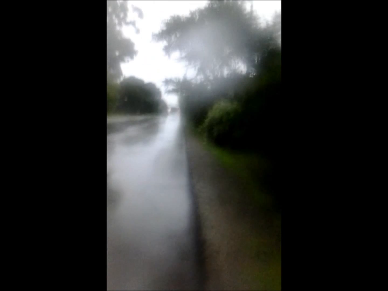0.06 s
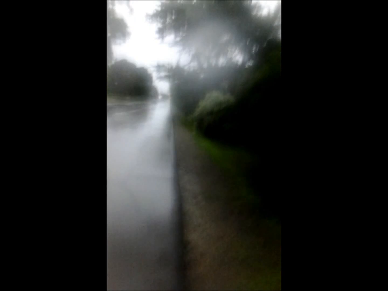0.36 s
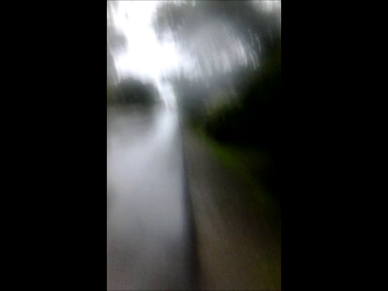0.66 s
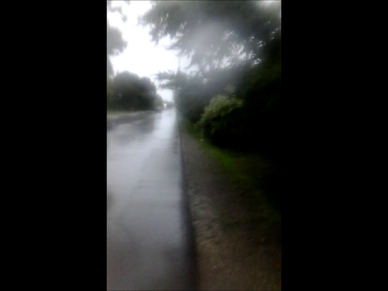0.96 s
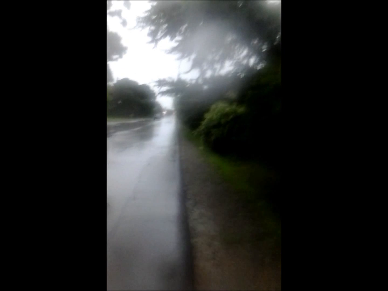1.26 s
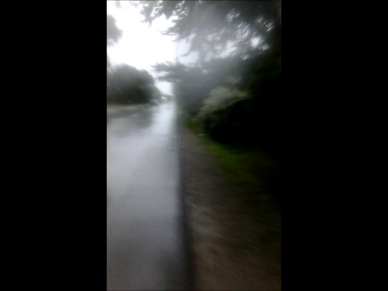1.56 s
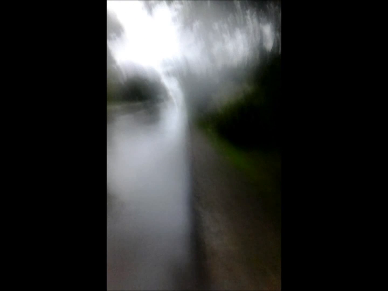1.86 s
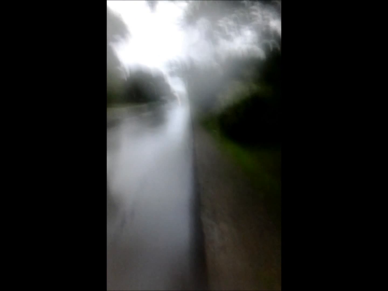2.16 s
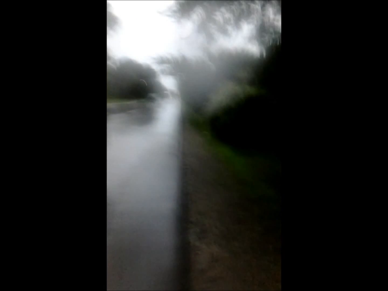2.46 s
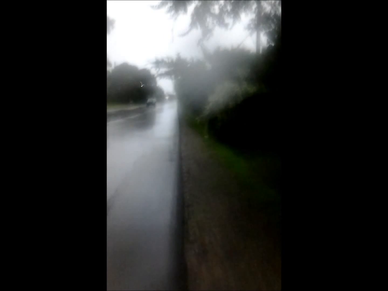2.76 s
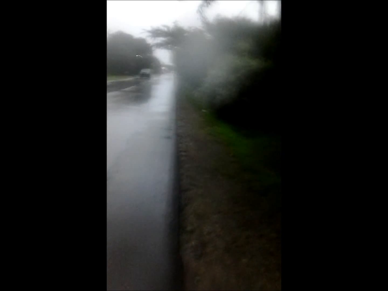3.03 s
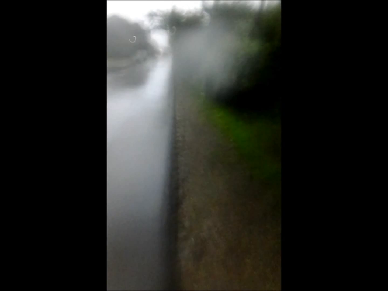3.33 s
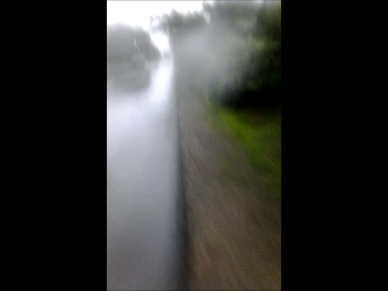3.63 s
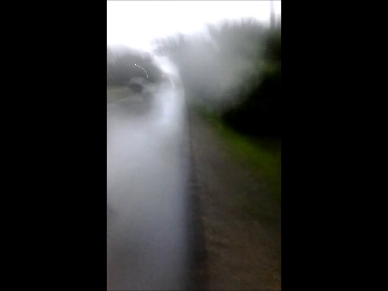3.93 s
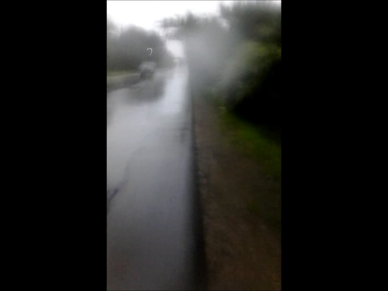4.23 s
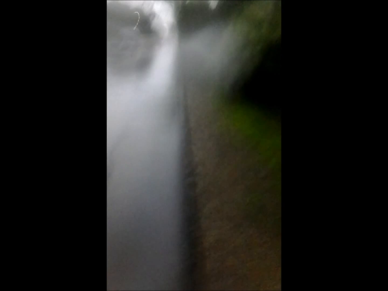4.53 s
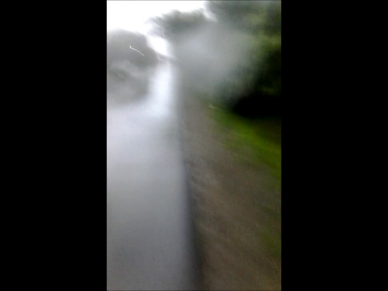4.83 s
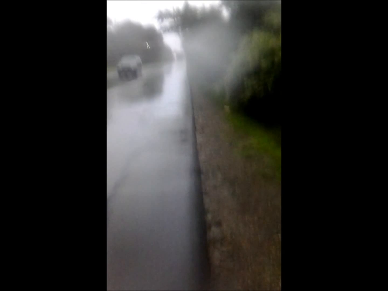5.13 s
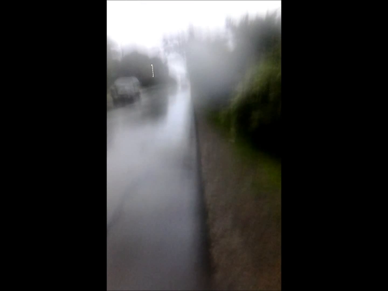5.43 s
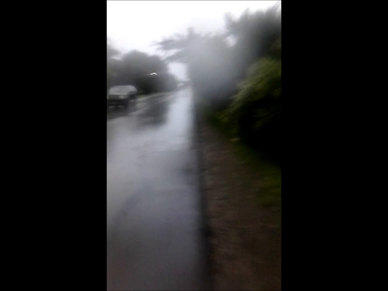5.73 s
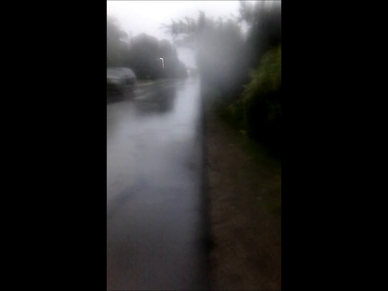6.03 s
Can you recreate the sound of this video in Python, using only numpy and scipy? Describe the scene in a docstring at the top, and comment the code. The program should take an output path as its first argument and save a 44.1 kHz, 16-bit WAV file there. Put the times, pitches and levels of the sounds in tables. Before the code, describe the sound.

Heavy rain patters throughout beside a wet road, heard through a wet, slightly muffled microphone. From the start, wind buffets it with a low rumble, giving soft thumps between 0.6 and 1 second, while an engine hums with a faint, rough whine. The rain thickens after about 1.2 seconds and the wind rushes hardest around 2 seconds. At about 2.4 seconds a car draws level with a low rumble, more wind thumps and a swell of hissing spray, its tyres roaring as it recedes around 3 seconds. A second engine hum swells near 4 seconds. At 4.2 seconds one big drop lands on the microphone's casing with a loud, short plop. Small drops tick now and then, most clearly at 5.1 and 5.3 seconds. From about 5 seconds another car's softer hiss approaches through the patter, with a last gust just before 6 seconds.

```python
"""A walk beside a wet road in heavy rain, heard from a camera whose wet microphone port rings near
2 and 4 kHz and muffles the treble. From the start wind buffets the port and an engine hums and whines.
At 2.4 s a car draws level, its tyres throwing spray, and recedes. Near 4 s a second engine swells
and one big drop plops on the casing; small ones tick beside the port now and then. Towards the end
another car's hiss approaches through the patter."""
import sys
import numpy as np
from scipy import signal
from scipy.fft import rfft, irfft, next_fast_len
from scipy.io import wavfile
from scipy.ndimage import uniform_filter1d, map_coordinates

SR = 44100
rng = np.random.default_rng(int(sys.argv[2]) if len(sys.argv) > 2 else 0)


def generate_wav(sig):
    """Save sig (samples, or channels by samples) to the path in sys.argv[1] as 16-bit PCM at SR."""
    pcm = np.round(np.clip(np.atleast_2d(sig).T, -1, 1) * 32767).astype(np.int16)
    wavfile.write(sys.argv[1], SR, pcm)


N = 268569


# The breeze at the microphone. Each row: time in seconds, strength in dB.
BREEZE_STRENGTH = [(0, -0.5), (1.1, 1.5), (1.38, 0), (2.05, 6.5), (2.7, -0.2), (3.7, 0), (4.4, -3.5),
                   (5.3, -3), (6.09, -6.5)]
# Gusts on the port. Each row: peak time and half length in seconds, buffet lift and rush lift in dB.
PORT_GUSTS = [(0.184, 0.045, 4.5, -0.5), (0.37, 0.075, 5.5, -2.5), (0.617, 0.036, 4.5, 4),
              (0.773, 0.043, 2.5, 1.5), (0.9, 0.011, 9, 3.5), (0.97, 0.018, 2, 3), (1.19, 0.027, 0.5, 1.5),
              (1.75, 0.08, 2, -0.5), (2.404, 0.076, 4, 2), (2.591, 0.024, 5, 4), (2.72, 0.028, 2.5, 1.5),
              (2.927, 0.079, 6, 4.5), (3.51, 0.024, 2, 4), (4.253, 0.053, 3.5, 3.5), (4.563, 0.02, 2, 3),
              (5.863, 0.17, 3, 5)]
# Low buffeting and the rush of air above it. Each row: frequency in Hz, relative level in dB.
BUFFET_SPECTRUM = [(15, -7.5), (30, -2.5), (55, 0), (95, 2), (150, -1.5), (200, -11), (320, -25),
                   (700, -84.5), (3000, -120)]
RUSH_SPECTRUM = [(90, -28.5), (170, -4), (240, 1), (340, -3.5), (480, -6), (650, -8.5), (1100, -27),
                 (3000, -78), (7000, -100)]

def wind(eddy_db=2.0, churn_s=0.063):
    """Right on the microphone: gusts ride on the breeze, eddies buffet the port and shake the rush."""
    breeze_db, = curves(BREEZE_STRENGTH)
    buffet_db = -26.5 + 0.45 * breeze_db
    rush_db = -29 + breeze_db
    for s, half, buffet_lift, rush_lift in PORT_GUSTS:
        gust = np.exp(-.5 * (since(s) / half) ** 2)
        buffet_db += buffet_lift * gust
        rush_db += rush_lift * gust
    eddies = amp(eddy_db * wobble(30))
    buffet = steadied(eddies * noise(BUFFET_SPECTRUM), churn_s)
    rush = steadied(eddies * noise(RUSH_SPECTRUM), churn_s)
    return amp(buffet_db) * buffet + amp(rush_db) * rush


# Blows of air on the port. Each row: start in seconds, peak in dB, final pitch in Hz.
HARD_EDDIES = [(0.586, -12.5, 55), (0.609, -15, 59), (0.878, -19, 74.6), (0.967, -12.5, 71),
               (2.38, -15, 107), (2.429, -15, 45), (2.575, -17, 80), (3.486, -18, 44.7), (4.551, -15, 59.3)]

def wind_thumps(rise_s=0.0052, fall_s=0.0062, start_ratio=2.7):
    """The hardest eddies hit the port as single soft blows that sink in pitch."""
    track, t = np.zeros(N), np.arange(SR // 10) / SR
    for s, db, final_hz in HARD_EDDIES:
        hz = final_hz * (1 + (start_ratio - 1) * np.exp(-t / fall_s))
        add(track, s, amp(db) * bump(t, rise_s) * np.sin(phase_of(hz)))
    return track


# Cars going by on the wet road. Each row: loudest moment, approach and retreat in seconds, hiss in dB.
HISS_PASSES = [(2.358, 0.067, 0.85, -27), (3.95, 0.1, 0.3, -38.5), (5.4, 0.48, 0.53, -37)]
# Their spray from the roadside. Each row: frequency in Hz, relative level in dB.
SPRAY_SPECTRUM = [(700, -28.5), (1200, -7), (1550, -5), (1800, -2.5), (1950, 0.94), (2130, -0.5),
                  (2290, -5), (2550, -12), (2950, -18.5), (3600, -19), (4500, -34), (5400, -39),
                  (6300, -54.5), (7500, -79)]
# Its brightest band, low from an oncoming car and high from behind one.
# Each row: time in seconds, centre in Hz, lift in dB.
SPRAY_BAND = [(0, 1505, 3.5), (1.6, 1610, 0.5), (1.95, 1930, 5.5), (2.36, 2100, 1), (2.58, 1850, 5),
              (2.8, 2640, 10), (4.7, 2900, 7), (5.05, 2500, 1.5), (5.35, 1640, 1), (6.09, 1550, -0.5)]
# Its narrow crest, climbing as a car goes by, then sinking.
# Each row: time in seconds, centre in Hz, lift in dB.
HISS_CREST = [(0, 2000, 3), (2.2, 2000, 0.5), (2.38, 1960, 5.5), (2.65, 2010, 1), (2.95, 2110, 3),
              (3.901, 2060, 5), (4.8, 1930, -0.5), (5.5, 1830, 4.5), (6.09, 1970, -1)]

def tyre_spray(far_db=-36, flutter_db=0.69):
    """Tyres throw water off the road; each car's hiss swells out of the distance and changes colour."""
    spray = swept(noise(SPRAY_SPECTRUM), SPRAY_BAND, width_octaves=0.46)
    spray = swept(spray, HISS_CREST, width_octaves=0.045)
    flutter = amp(flutter_db * wobble(30))
    return traffic(HISS_PASSES, far_db) * flutter * spray


# Tread going by. Each row: loudest moment, approach and retreat in seconds, level in dB.
TREAD_PASSES = [(0.08, 0.2, 0.25, -34.5), (2.919, 0.22, 0.33, -29.5), (3.52, 0.23, 0.14, -33.5),
                (4.6, 0.39, 0.6, -39)]
# Its roar from the roadside. Each row: frequency in Hz, relative level in dB.
TREAD_SPECTRUM = [(200, -10), (450, -5.5), (620, 2.5), (780, 4), (1000, -0.5), (1300, -6), (1800, -16),
                  (3000, -73.5), (7000, -91)]
# The roar's strongest band. Each row: time in seconds, centre in Hz, lift in dB.
TREAD_BAND = [(0, 620, 2.5), (1.4, 630, 3.5), (2.05, 504, 0), (2.6, 634, 2), (3.3, 694, 5.5),
              (4.601, 818, 4.5), (5.3, 690, 3), (6.09, 604, 3.5)]

def tread_roar(far_db=-34.5):
    """Tread roars on the asphalt, near cars rising above the distant traffic."""
    roar = swept(noise(TREAD_SPECTRUM), TREAD_BAND, width_octaves=0.31)
    return traffic(TREAD_PASSES, far_db) * roar


# Engines out on the road. Each row: loudest moment, rise and fade in seconds, level in dB, # firing rate at the
# loudest moment in Hz, octave level against the firing note in dB.
ENGINE_NOTES = [(.5, 0.86, 1, -31.5, 105, -17.5), (3.947, 0.19, 0.54, -27.5, 103.9, -10)]

def engine_hum(waver_db=2.1, sag_hz_per_s=2, octave_lag_s=0.98):
    """Low, unsteady firing notes sink as they go by; each one's octave swells later."""
    drift = 1 + .004 * wobble(8)
    hum = np.zeros(N)
    for s, rise, fade, db, firing_hz, octave_db in ENGINE_NOTES:
        phase = phase_of((firing_hz - sag_hz_per_s * since(s * 1.0)) * drift)
        firing = swell(s, rise, fade) * unit(np.sin(phase))
        octave = amp(octave_db) * swell(s + octave_lag_s, octave_lag_s, fade) * unit(np.sin(2 * phase))
        hum += amp(db + waver_db * wobble(6.2)) * (firing + octave)
    return hum


# The first engine's whine. Each row: frequency in Hz, relative level in dB.
WHINE_SPECTRUM = [(440, -39), (480, -4.5), (494, -5), (508, -3), (550, -38.5), (900, -100)]

def engine_whine(db=-36):
    """A faint, rough whine near 500 Hz comes off the road with the first engine."""
    return amp(db) * swell(0.3, rise_s=0.24, fade_s=0.9) * noise(WHINE_SPECTRUM)


# The body of the nearest car. Each row: frequency in Hz, relative level in dB.
RUMBLE_SPECTRUM = [(60, -51), (120, -10), (145, -1.5), (175, -4.5), (205, -25), (600, -100)]

def car_rumble(db=-29.5):
    """The nearest car rumbles as it draws level with the microphone."""
    rumble = steadied(noise(RUMBLE_SPECTRUM), span_s=0.11)
    return amp(db) * swell(2.3, rise_s=0.41, fade_s=0.8) * rumble


# A big drop on the camera itself. Each row: start in seconds, peak in dB,
# first and last pitch in Hz, glide and rise in seconds.
CASING_DROPS = [(4.1909, -8.5, 3330, 380, 0.00081, 0.0011)]

def casing_plop(shove_db=-9.5, shove_delay_s=0.0012, shove_rise_s=0.00081):
    """A big drop lands on the casing with a falling plop and shoves it as it flattens."""
    track, t = np.zeros(N), np.arange(SR // 20) / SR
    for s, db, first_hz, last_hz, glide, rise in CASING_DROPS:
        hz = last_hz + (first_hz - last_hz) * np.exp(-t / glide)
        add(track, s, amp(db) * bump(t, rise) * np.sin(phase_of(hz)))
        add(track, s + shove_delay_s, amp(shove_db) * bump(t, shove_rise_s))
    return track


# Small drops just beside the port. Each row: start in seconds, tick peak in dB, pitch in Hz,
# rise in seconds, splash level in dB.
PORT_DROPS = [(0.945, -44, 6750, 0.00055, -54), (1.951, -39, 4620, 0.0008, -53),
              (2.716, -34, 5500, 0.00074, -39), (3.3054, -37, 4430, 0.0008, -46),
              (5.0985, -30, 4180, 0.0016, -40), (5.3173, -24.5, 7560, 0.00012, -54)]

def port_ticks(port_hz=4400, port_rise_s=0.0003, port_db=-5.5, splash_t60=0.044, splash_octaves=0.29):
    """Each small drop ticks, rings the microphone port briefly and scatters droplets."""
    track, t = np.zeros(N), np.arange(SR // 20) / SR
    octaves = np.log2(np.fft.rfftfreq(len(t), 1 / SR) + 1)
    for s, db, hz, rise, splash_db in PORT_DROPS:
        band = np.exp(-.5 * ((octaves - np.log2(hz)) / splash_octaves) ** 4)
        droplets = unit(irfft(rfft(rng.standard_normal(len(t))) * band, len(t)))
        splash = amp(splash_db - 60 * t / splash_t60) * (1 - np.exp(-t / rise)) * droplets
        tick = bump(t, rise) * np.sin(2 * np.pi * hz * t)
        ring = amp(port_db) * bump(t, port_rise_s) * np.sin(2 * np.pi * port_hz * t)
        add(track, s, amp(db) * (tick + ring) + splash)
    return track


# Flurries close by. Each row: loudest moment, rise and fade in seconds, patter and fine splashes in dB.
RAIN_FLURRIES = [(0.02, 0.092, 0.091, -48, -62.5), (0.74, 0.018, 0.1, -58, -64.5),
                 (1.261, 0.12, 0.48, -40, -52.5), (1.88, 0.057, 0.45, -42, -50.5),
                 (2.14, 0.059, 0.23, -48, -55.5), (2.549, 0.4, 1, -39, -67.5),
                 (3.321, 0.18, 0.33, -42, -56), (3.98, 0.067, 0.079, -48.5, -58),
                 (4.33, 0.06, 0.6, -54, -63.5), (5.15, 0.09, 0.22, -52.5, -65.5),
                 (5.65, 0.12, 1, -47.5, -63)]
# Patter and fine splashes through the wet port. Each row: frequency in Hz, relative level in dB.
PATTER_SPECTRUM = [(1000, -14.5), (2000, 11.5), (2900, -14), (3400, 3), (3850, 5.5), (4400, 1.5),
                   (5000, -9), (5600, -30), (6500, -49.5), (7500, -63), (9000, -79.5)]
FINE_SPLASH_SPECTRUM = [(3500, -24.5), (4800, 21), (5700, 13.5), (6500, 12.5), (7300, 4.5), (8200, -14),
                        (9200, -19), (10500, -64)]

def rain(steady_patter_db=-44.5, steady_fine_db=-86):
    """Near drops patter over the wash of countless far ones; flurries swell it and add fine splashes."""
    patter_gain, fine_gain = amp(steady_patter_db), amp(steady_fine_db)
    for s, rise, fade, patter_db, fine_db in RAIN_FLURRIES:
        flurry = swell(s, rise, fade)
        patter_gain = np.hypot(patter_gain, amp(patter_db) * flurry)
        fine_gain = np.hypot(fine_gain, amp(fine_db) * flurry)
    near = drops(per_s=990, spread_db=2.5, spectrum=PATTER_SPECTRUM)
    fine = drops(per_s=1100, spread_db=3.5, spectrum=FINE_SPLASH_SPECTRUM)
    clumps = amp(2 * wobble(30))
    far = noise(PATTER_SPECTRUM)
    patter = unit(far + amp(-4) * near) + amp(-11.5) * splats()
    return patter_gain * patter + fine_gain * clumps * fine


def splats(per_s=70, centre_hz=4200, scatter_octaves=0.3, rise_s=0.0007, spread_db=3.5):
    """Single drops land close by, each with its own pitch and size, heard through the wet port; rms 1."""
    track, t = np.zeros(N), np.arange(SR // 50) / SR
    for when, size, pitch in rng.random((round(per_s * N / SR), 3)):
        db = spread_db * min(-np.log(1 - size), 2)
        hz = centre_hz * 2 ** (scatter_octaves * (2 * pitch - 1))
        add(track, when * N / SR, amp(db) * bump(t, rise_s) * np.sin(2 * np.pi * hz * t))
    return coloured(track, PATTER_SPECTRUM)


def drops(per_s, spread_db, spectrum):
    """Impacts at random moments, many small and a few large, at rms 1."""
    falls = rng.random(N) < per_s / SR
    sizes = amp(spread_db * np.minimum(rng.exponential(size=N), 3.5)) * rng.choice([-1, 1], N)
    return coloured(falls * sizes, spectrum)


def traffic(passes, far_db):
    """The road's gain: each car falls off as one over its distance and adds in power to far traffic."""
    gain = amp(far_db)
    for s, approach, retreat, db in passes:
        t = since(s)
        distance = np.hypot(1, t / np.where(t < 0, approach, retreat))
        gain = np.hypot(gain, amp(db) / distance)
    return gain


def swept(x, rows, width_octaves):
    """x with a moving band lifted; the loudness stays steady."""
    hz, t, spectra = signal.stft(x, SR, nperseg=1024)
    centre_hz, lift_db = [np.interp(t, since(0), c) for c in curves(rows)]
    band = np.exp(-.5 * (np.log2((hz[:, None] + 1) / centre_hz) / width_octaves) ** 2)
    lifted = signal.istft(spectra * amp(lift_db * band), SR, nperseg=1024)[1][:N]
    return steadied(lifted, span_s=0.6)


def amp(db):
    """Decibels to gain."""
    return 10 ** (np.asarray(db) / 20)


def unit(x):
    """x at rms 1."""
    return x / np.sqrt(np.mean(x ** 2) + 1e-20)


def steadied(x, span_s):
    """x held near rms 1 over every span."""
    size = round(span_s * SR)
    power = uniform_filter1d(uniform_filter1d(x ** 2, size), size)
    return x / np.sqrt(np.abs(power))


def since(s):
    """Seconds since time s, at every sample."""
    return np.arange(N) / SR - s


def phase_of(hz):
    """The running phase of a changing pitch."""
    return 2 * np.pi * np.cumsum(hz) / SR


def swell(s, rise_s, fade_s):
    """A gain that rises smoothly to 1 at time s and dies away."""
    t = since(s)
    return np.exp(-.5 * (np.minimum(t, 0) / rise_s) ** 2 - np.maximum(t, 0) / fade_s)


def bump(t, rise):
    """A soft-edged pulse that reaches 1 after rise seconds."""
    return (t / rise * np.exp(1 - t / rise)) ** 2


def curves(rows):
    """Each column after the time, at every sample."""
    s, *cols = np.transpose(rows)
    return [np.interp(since(0), s, c) for c in cols]


def wobble(rate):
    """A smooth random curve, rate knots a second."""
    return map_coordinates(rng.standard_normal(int(N * rate / SR) + 4), [np.arange(N) * rate / SR])


def filtered(x, response):
    """x times a response of frequency."""
    size = next_fast_len(N + SR // 2)
    return irfft(rfft(x, size) * response(np.fft.rfftfreq(size, 1 / SR)), size)[:N]


def coloured(x, spectrum):
    """x shaped by (Hz, dB) points joined on a log axis, at rms 1."""
    points_hz, db = np.transpose(spectrum)
    return unit(filtered(x, lambda hz: amp(np.interp(np.log(hz + 1), np.log(points_hz + 1), db))))


def noise(spectrum):
    """Fresh noise of rms 1 with the given spectrum."""
    return coloured(rng.standard_normal(N), spectrum)


def add(track, s, sound):
    """Mix a sound into the track at time s."""
    part = track[round(s * SR):][:len(sound)]
    part += sound[:len(part)]


def scene():
    """Wind, road and rain meet at one microphone at the roadside."""
    air = wind() + wind_thumps()
    road = engine_hum() + engine_whine() + car_rumble() + tread_roar() + tyre_spray()
    water = rain() + casing_plop() + port_ticks()
    return (air + road + water)[None]


def record(dry):
    """The camera keeps nothing above its band limit."""
    top_hz = 11000
    return filtered(dry[0], lambda hz: 1 / np.hypot(1, (hz / top_hz) ** 40))[None]


dry = scene()
out = record(dry)
generate_wav(out)
```